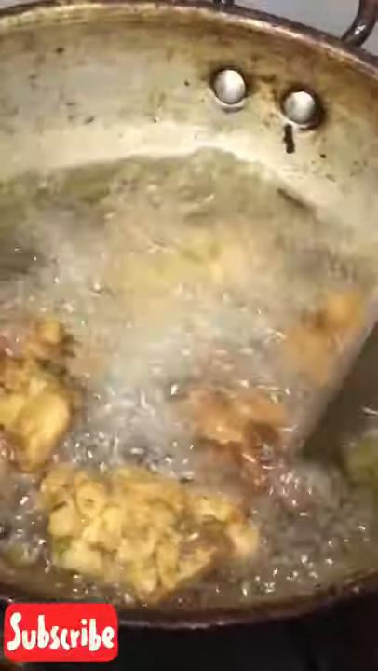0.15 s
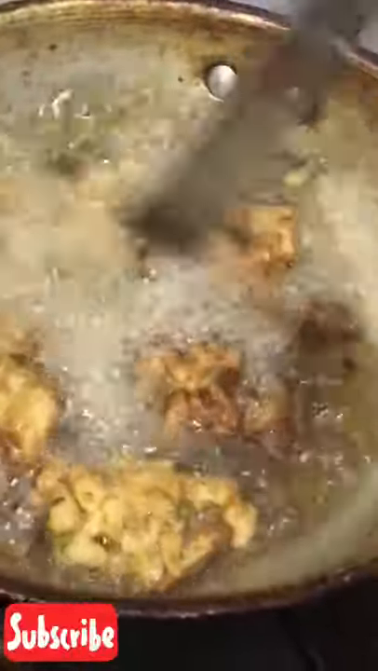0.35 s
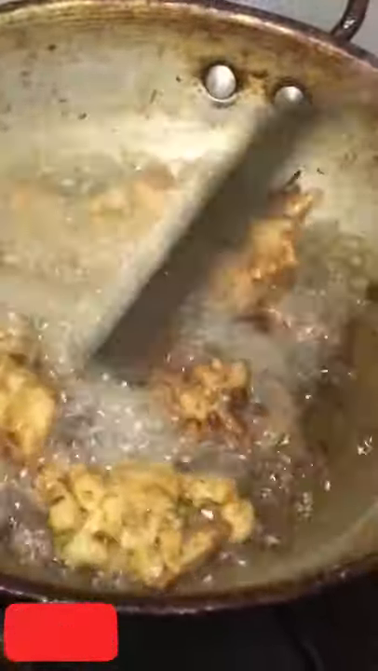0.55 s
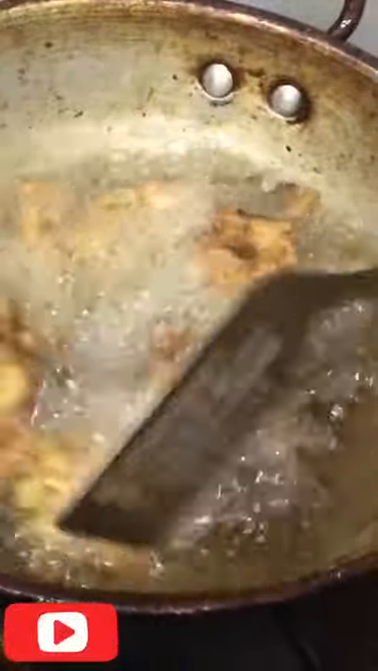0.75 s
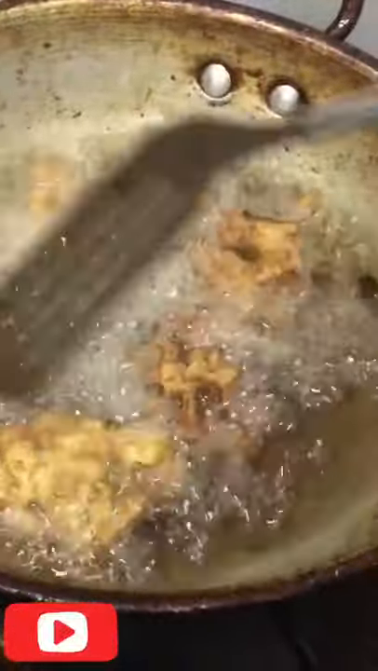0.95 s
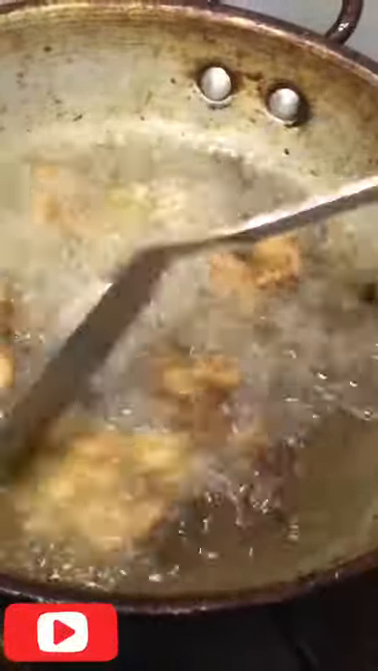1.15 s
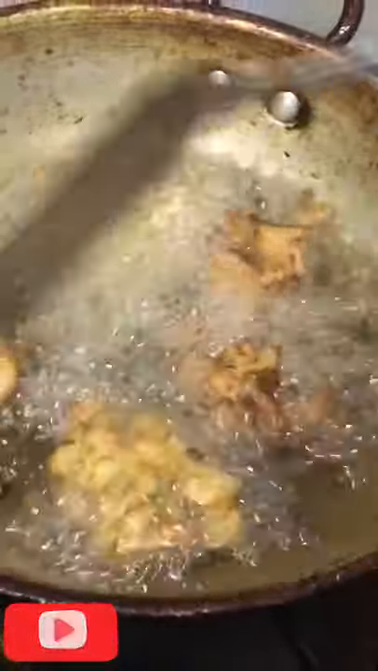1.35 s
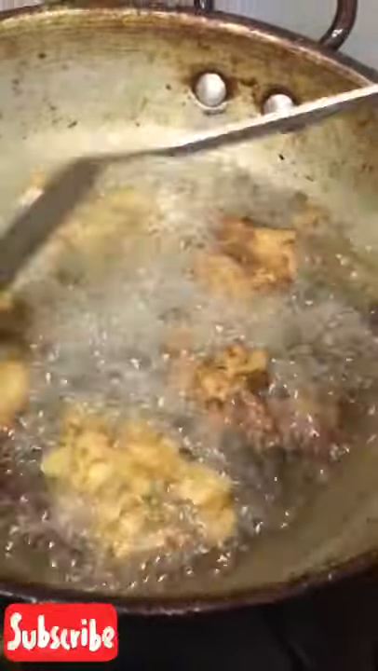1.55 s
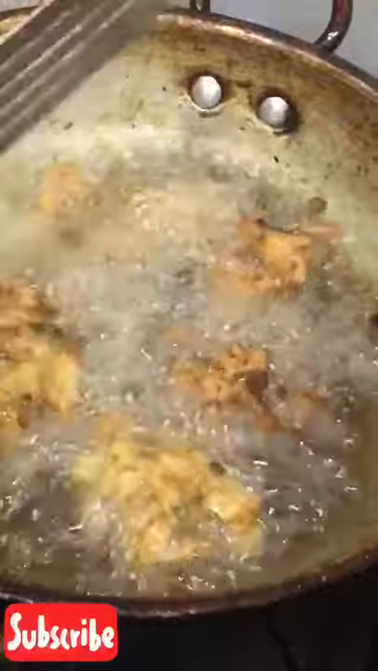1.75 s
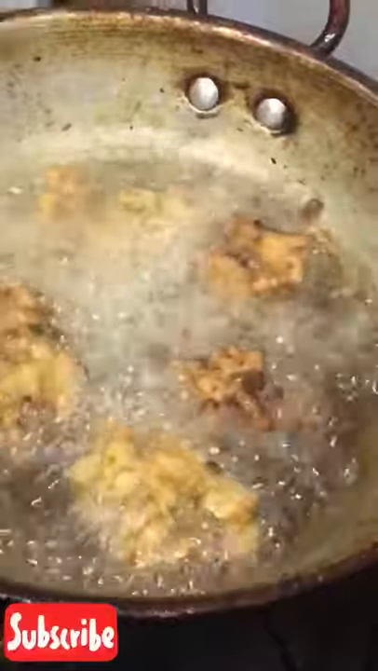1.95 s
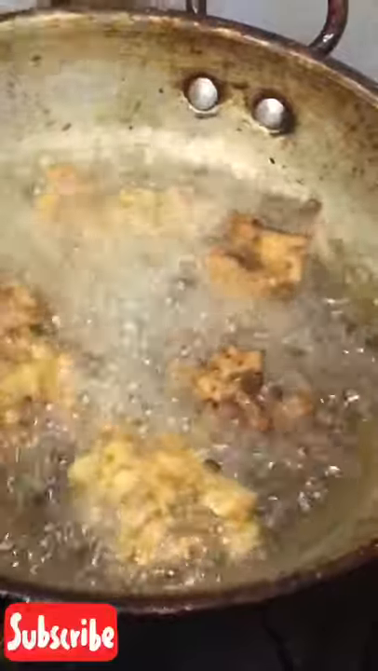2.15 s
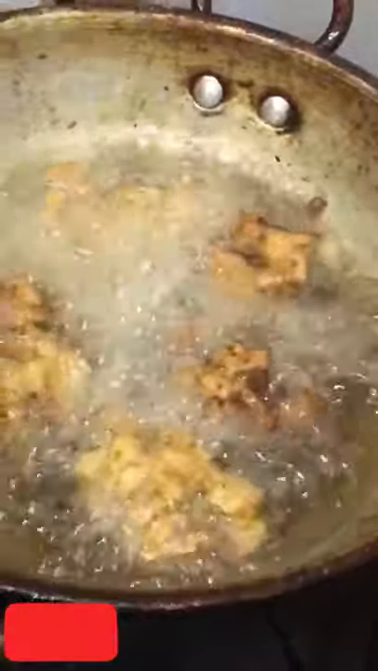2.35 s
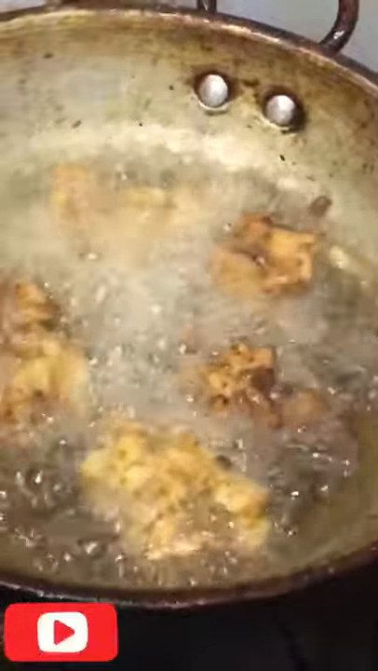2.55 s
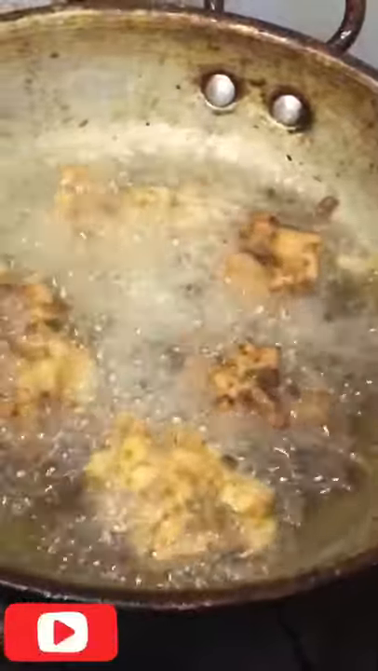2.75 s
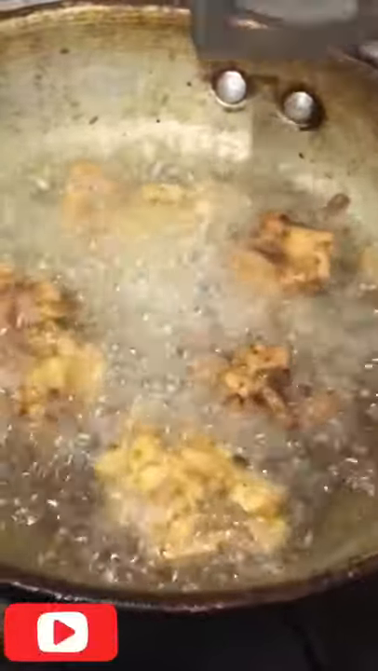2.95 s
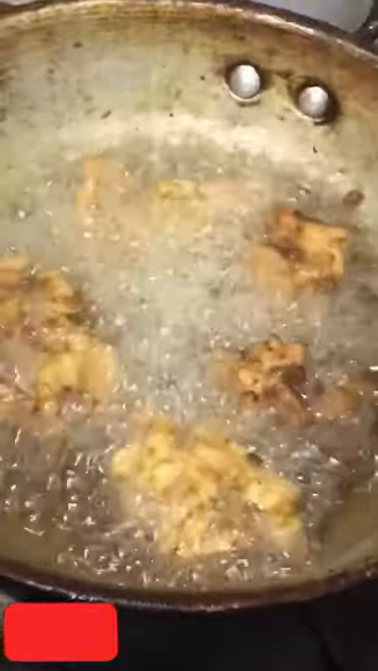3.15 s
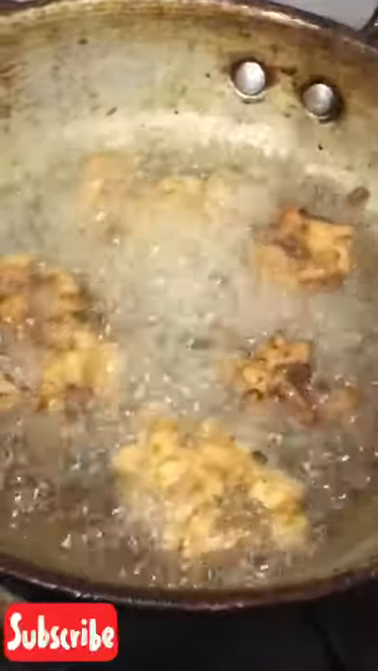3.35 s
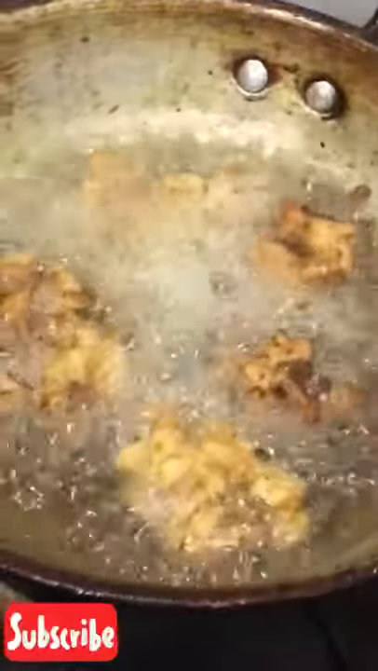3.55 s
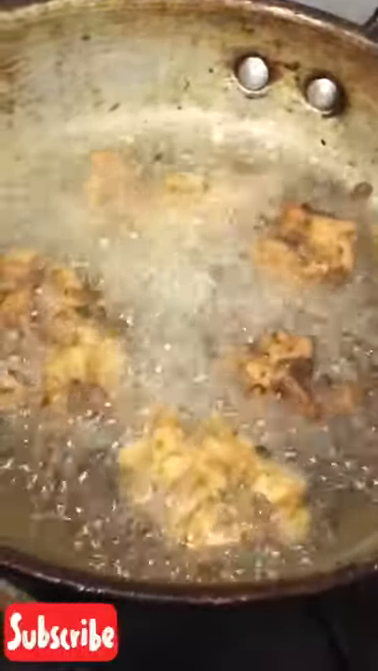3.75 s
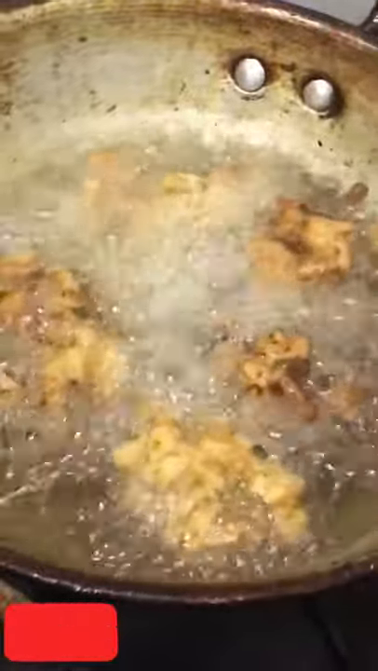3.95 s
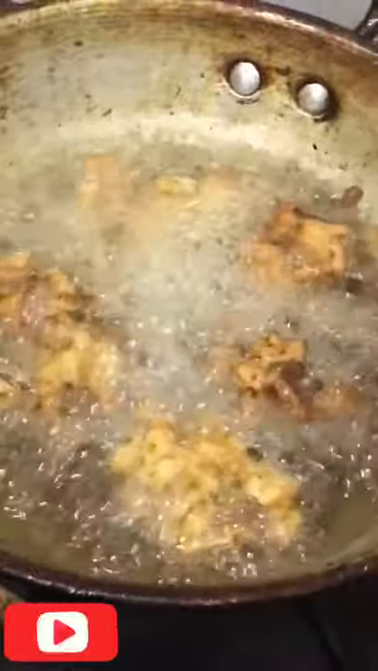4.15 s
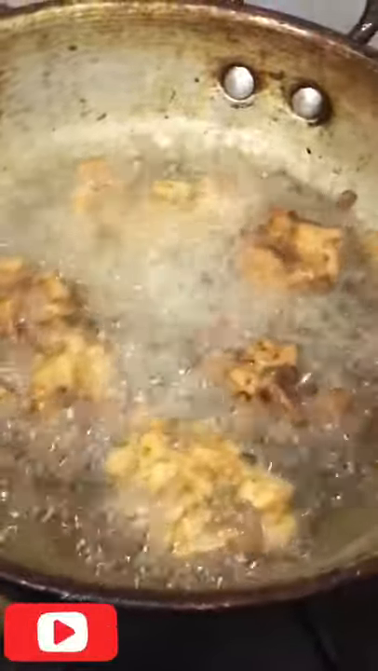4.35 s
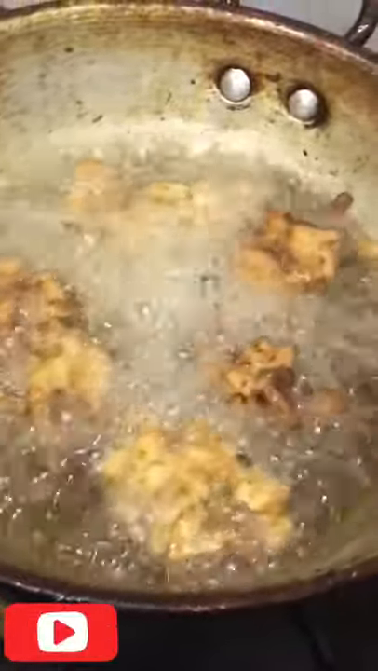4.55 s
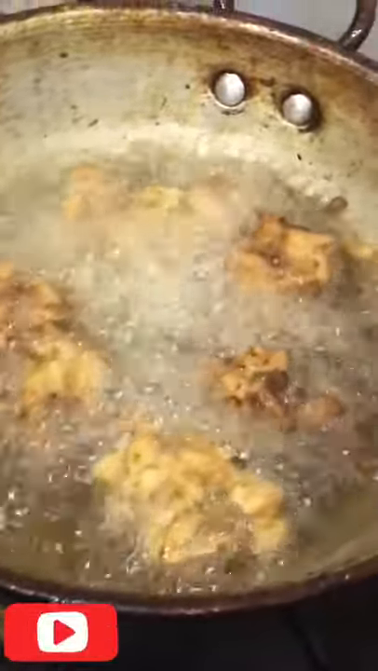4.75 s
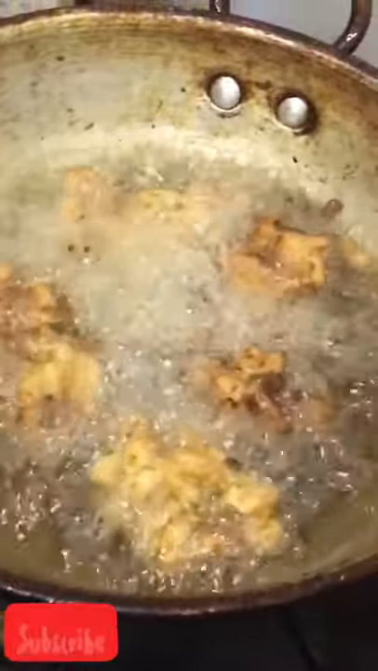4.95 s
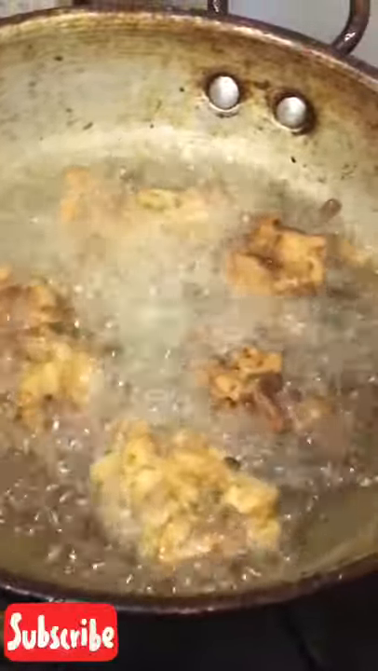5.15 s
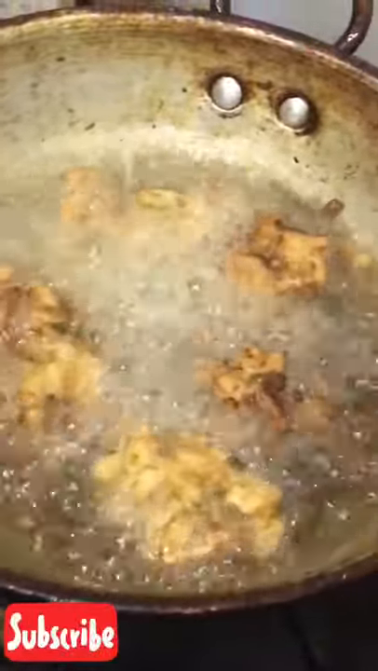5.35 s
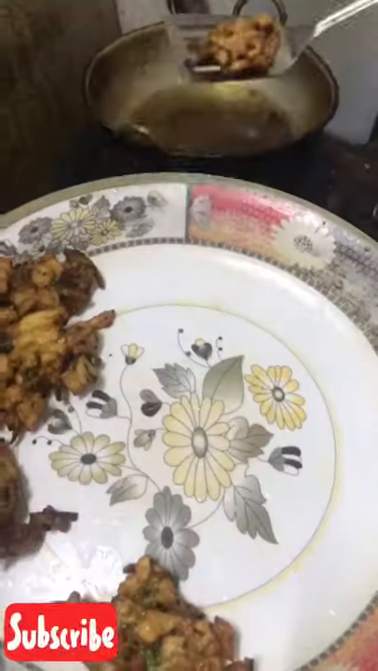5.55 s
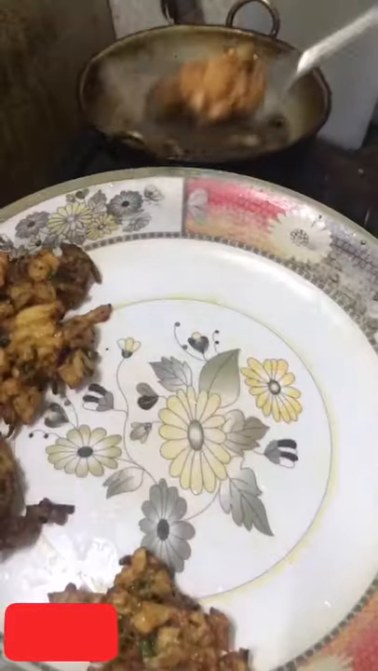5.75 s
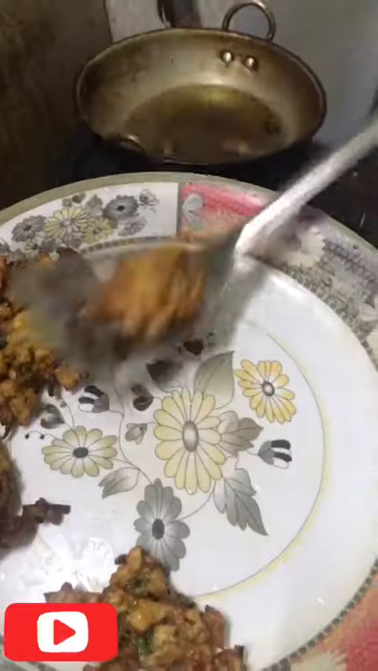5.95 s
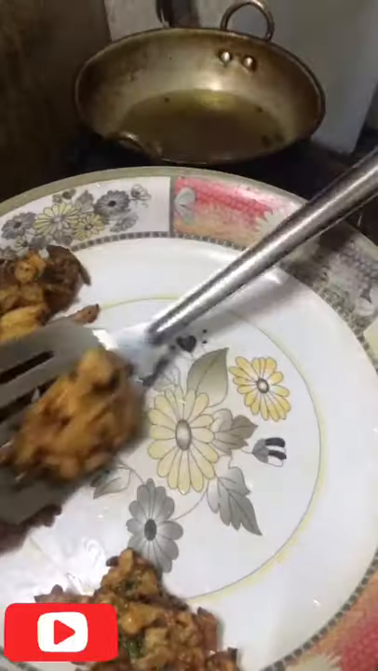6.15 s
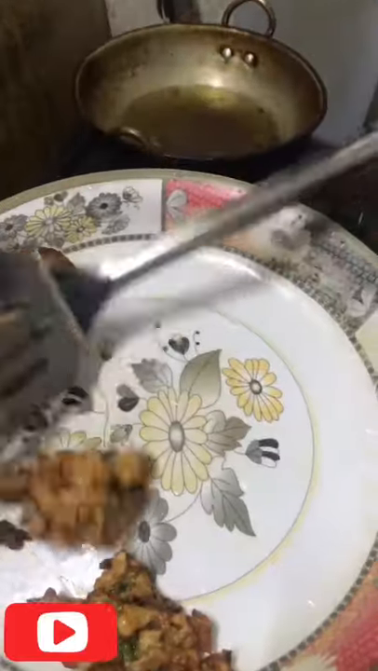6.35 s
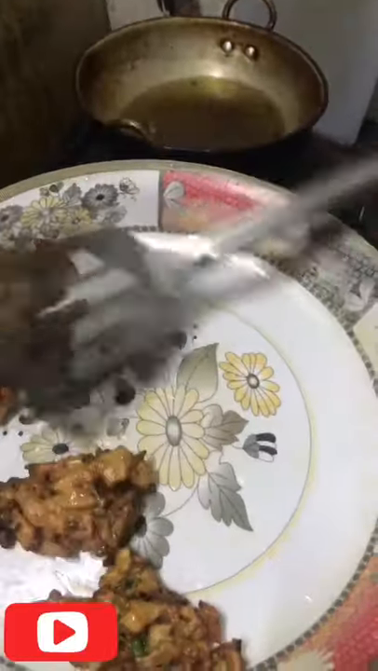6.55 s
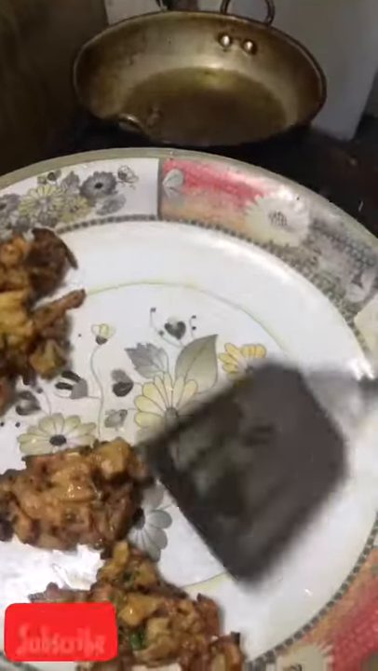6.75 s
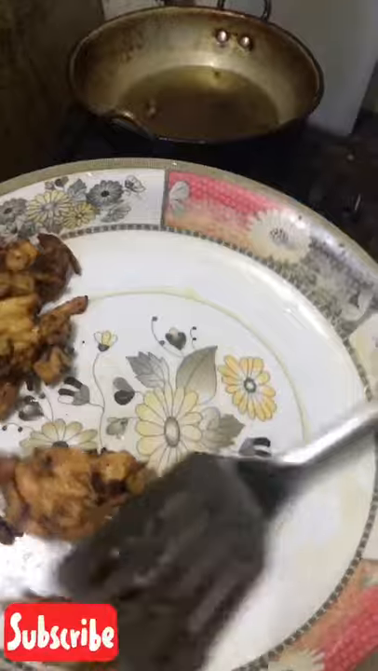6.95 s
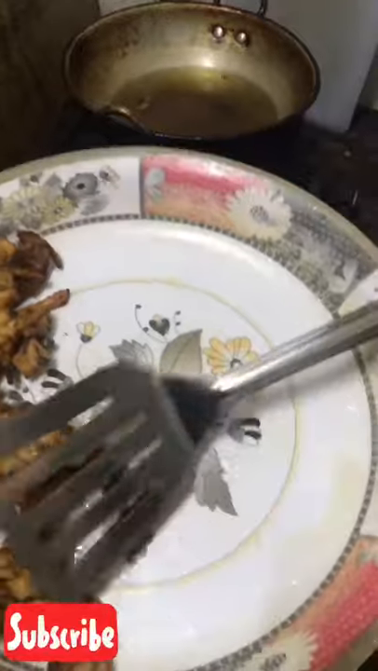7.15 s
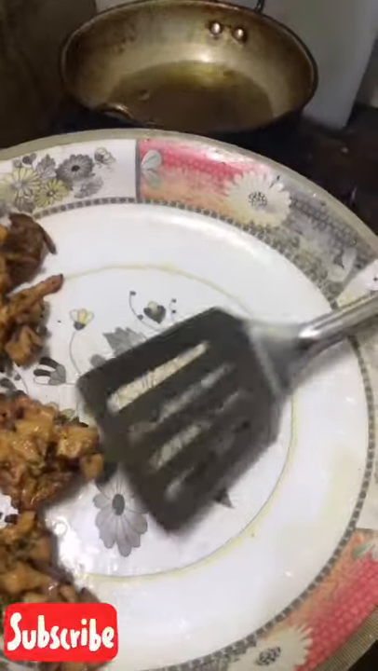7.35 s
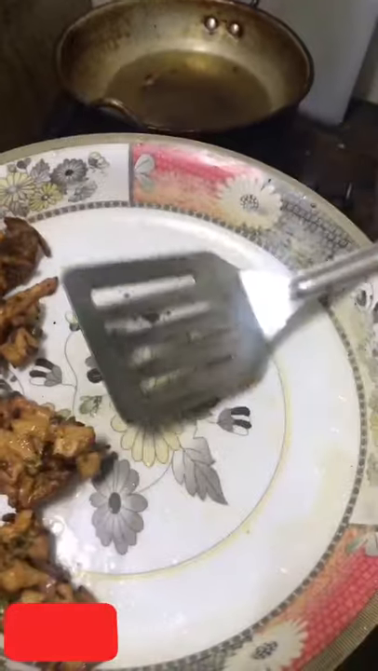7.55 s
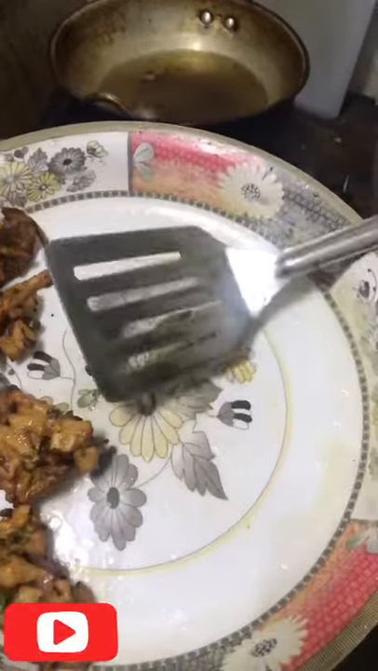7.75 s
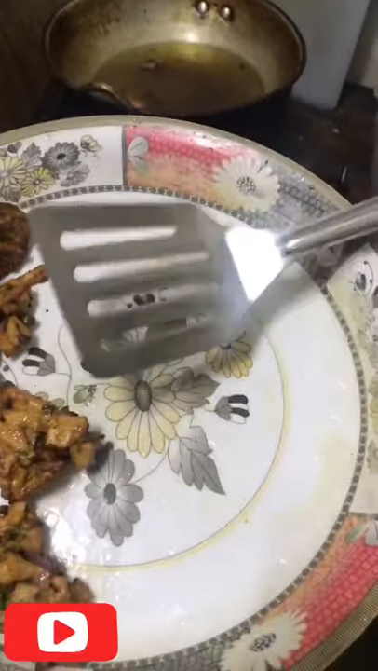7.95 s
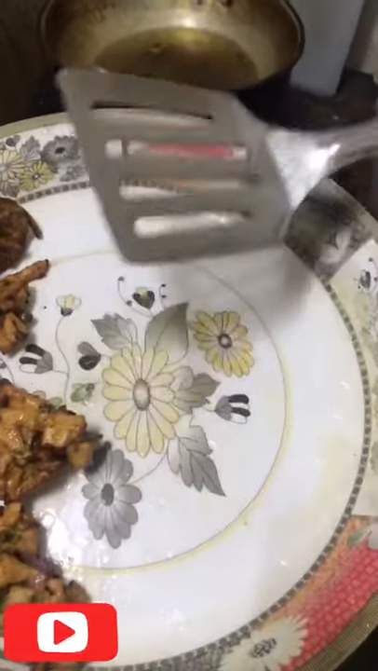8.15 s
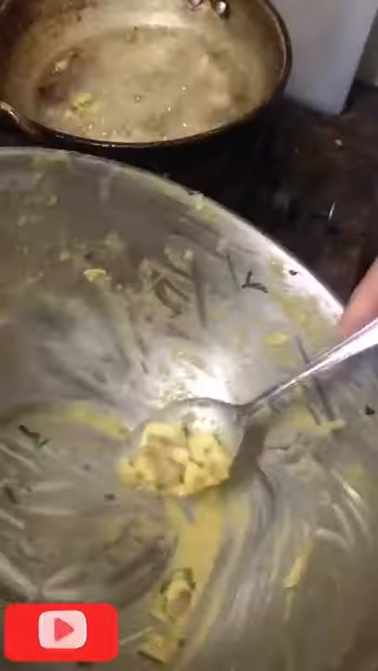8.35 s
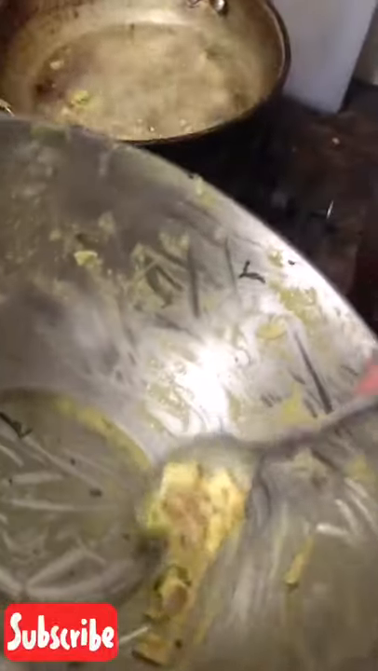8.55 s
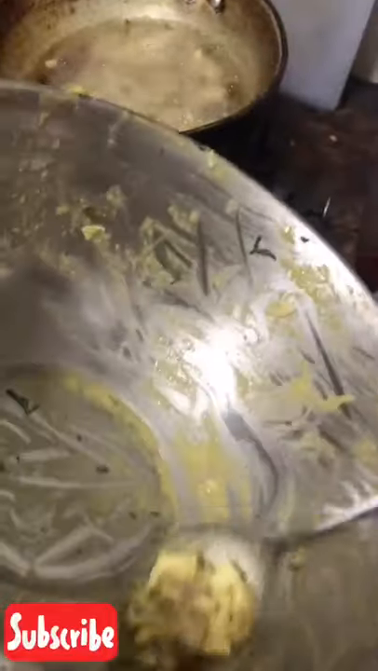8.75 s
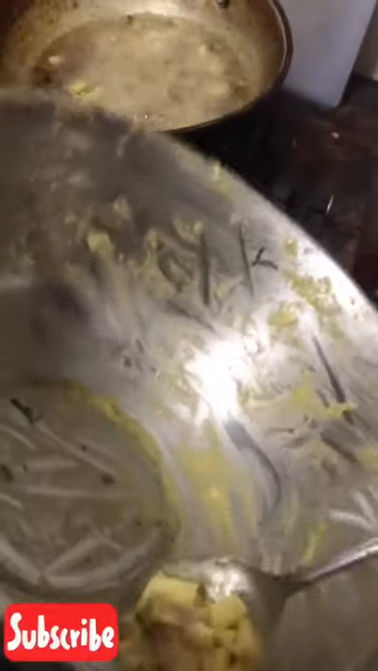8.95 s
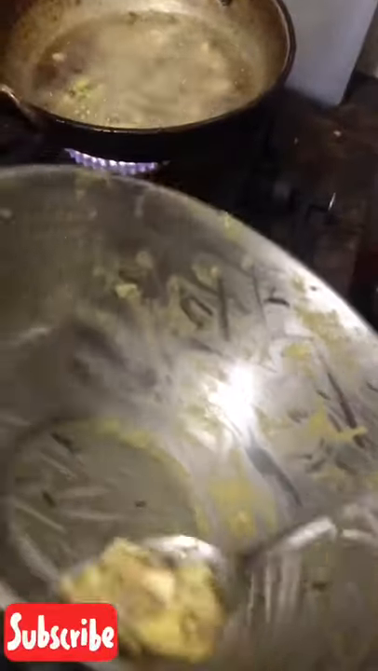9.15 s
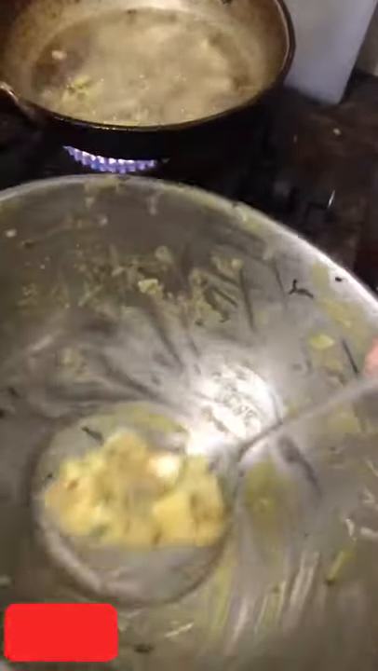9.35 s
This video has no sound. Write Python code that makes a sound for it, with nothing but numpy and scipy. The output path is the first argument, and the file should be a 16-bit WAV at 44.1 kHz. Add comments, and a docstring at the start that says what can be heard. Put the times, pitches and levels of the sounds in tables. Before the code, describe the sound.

Close crackling of deep frying gives way to spatula knocks on a plate and a spoon tapping and scraping a bowl over softer hissing.

```python
"""Frying fritters in a small kitchen

Three scenes follow one another in mono. Close to the pan, steam bursts make hot oil sizzle and spit
over the rumble of a gas burner and a low hum. Next the oil hisses further off and steam whistles from
a crust, while a slotted steel spatula knocks a fritter onto a plate, exciting the modes of plate and
blade. Last, a spoon strikes a steel bowl and scrapes batter from its wall by stick-slip friction."""
import sys
import numpy as np
from scipy import signal
from scipy.fft import rfft, irfft
from scipy.io import wavfile

SR = 44100
rng = np.random.default_rng(int(sys.argv[2]) if len(sys.argv) > 2 else 0)


def unload_wav(signal):
    """Save mono or channel-first audio to the path in sys.argv[1] as 16-bit WAV at rate SR, clipped to [-1, 1]."""
    wavfile.write(
        sys.argv[1],
        SR,
        np.round(np.clip(np.atleast_2d(signal).T, -1, 1) * 32767).astype(np.int16),
    )


N = 418509
PLATE_START_S, BOWL_START_S = 5.48, 8.245

# modes of the steel bowl: frequency_hz, level_db, t60_s
BOWL_MODES = [(603.6, -2.5, 0.18), (621, -25.5, 1), (590, -34, 0.2), (255, -20, 0.059), (683, -18, 0.14),
              (730, -28, 0.4), (840, -30.5, 0.78), (1150, -34, 0.44), (1850, -24, 0.16), (2460, -13, 0.12),
              (2570, -13, 0.056), (2660, -26, .12), (3320, 2.5, 0.024), (3290, 4.5, 0.0084),
              (3560, -37, .2), (3460, -9, 0.043), (4820, -33, .05), (5790, -10, 0.039), (6500, -23, 0.055),
              (7200, -20, 0.075), (8860, -25, 0.049)]
# spectrum of sliding steel: frequency_hz, gain_db
RASP_SPECTRUM = [(400, -3), (2400, -8), (3220, -6), (3390, 8), (3560, -18), (4000, -1), (5200, -10),
                 (6650, 4.5), (7700, -4), (8400, 1), (10000, 1.5), (11200, 1), (12500, -6), (16000, -11.5)]


def undb(db):
    """Amplitude ratio of a level in decibels."""
    return 10 ** (np.asarray(db) / 20)


def unit(x):
    """Normalisation to an rms of 1."""
    return x / np.sqrt(np.mean(x ** 2) + 1e-20)


def clock(seconds):
    """Sample times over a duration."""
    return np.arange(int(seconds * SR)) / SR


def fade(t, t60):
    """Exponential decay, 60 dB down at t60."""
    return np.exp(-np.log(1000) * t / max(t60, 1e-4))


def add(out, start_s, x):
    """Superposition of x on out from start_s."""
    i = max(int(start_s * SR), 0)
    out[i:i + len(x)] += x[:len(out) - i]


def colour(x, spectrum, size=4096):
    """Minimum-phase filter of unit power gain, shaped by rows of frequency_hz, gain_db."""
    hz, db = np.transpose(spectrum)
    bin_hz = np.arange(size // 2 + 1) * SR / size
    log_gain = np.log(undb(np.interp(np.log(bin_hz + 1), np.log(hz), db)))
    cepstrum = irfft(log_gain)[:size // 2]
    cepstrum[1:] *= 2
    response = irfft(np.exp(rfft(cepstrum, size)))
    return signal.oaconvolve(x, response / np.linalg.norm(response))[:len(x)]


def drift(rate_hz):
    """Random modulation: interpolated Gaussian values with a spread near 1."""
    knots = rng.standard_normal(size=4096)
    return 1.2 * np.interp(np.arange(N) / SR * rate_hz, np.arange(len(knots)), knots)


def grains(per_s, spread_db):
    """Shot noise: random clicks, mostly tiny and a few large."""
    size = undb(spread_db * np.minimum(rng.exponential(size=N), 7))
    occurs = rng.random(N) < per_s / SR
    return unit(occurs * size * rng.choice([-1, 1], N))


def burst(t60):
    """Transient excitation: a decaying shower of pressure spikes."""
    t = clock(.12)
    return rng.choice([-1., 1.], len(t)) * fade(t, t60)


def ring(modes):
    """Free vibration: damped modes that start from rest, with alternating sign."""
    t = clock(.7)
    return sum((-1) ** k * undb(db) * fade(t, t60) * np.sin(2 * np.pi * hz * t)
               for k, (hz, db, t60) in enumerate(modes))


def sizzle(spectrum, level_db, bubbles_per_s, spread_db):
    """Countless bursting bubbles make shot noise over an even hiss of steam."""
    fizz = grains(bubbles_per_s, spread_db) + 1.1 * rng.standard_normal(N)
    flicker_db = .35 * drift(25)
    return unit(colour(fizz, spectrum)) * undb(level_db + flicker_db)


def hum(near, waver_rad=0.75):
    """Two hum tones and the faint ring of the pan waver under random phase and amplitude modulation."""
    # tones of the hum, and the faint steady ring of the pan: frequency_hz, near_db, far_db
    tones = [(92, -51.5, -87), (115.7, -45, -55), (826, -87, -67.5)]
    t = np.arange(N) / SR
    out = np.zeros(N)
    for hz, near_db, far_db in tones:
        tone = np.sqrt(2) * np.sin(2 * np.pi * hz * t + waver_rad * drift(3.9))
        out += tone * undb((near_db if near else far_db) + 2 * drift(6.1))
    return out


def burner(near):
    """Combustion noise: the gas flame gives a low broadband rumble."""
    # the flame close by and further off: frequency_hz, gain_db
    near_spectrum = [(15, -28), (45, -6), (64, 0.5), (80, 3.5), (102, -3), (135, -4.5), (170, -13),
                     (200, -13.5), (240, -9.5), (330, -14), (450, -16.5), (700, -34)]
    far_spectrum = [(15, -11.5), (35, -18), (56, 4.5), (67, 0.5), (77, 5), (92, -5), (114, -7.5),
                    (145, -5.5), (200, -8), (250, -5), (330, -11.5), (450, -18.5), (700, -34)]
    spectrum, level_db = (near_spectrum, -45) if near else (far_spectrum, -48.5)
    return undb(level_db) * unit(colour(rng.standard_normal(N), spectrum, size=16384))


def throb(level_db=-48.5, swell_db=3.5, swell_rate_hz=4.5):
    """The burner's draught modulates the amplitude of the flame's deepest noise at random."""
    # lowest band of the flame: frequency_hz, gain_db
    spectrum = [(15, -52), (34, -36), (44, -12), (49, -4), (56, -19), (80, -50), (200, -64)]
    rumble = unit(colour(rng.standard_normal(N), spectrum, size=16384))
    return rumble * undb(level_db + swell_db * drift(swell_rate_hz))


def pop(level_db, centre_hz, octaves, t60, snap):
    """Cavity resonance driven by a spike of height snap and a burst; level_db is its energy over 4 ms."""
    half_width = max(octaves, .1) / 2
    edges_hz = np.clip(centre_hz * 2 ** np.array([-half_width, half_width]), [50, 100], [14000, 17000])
    kick = burst(t60)
    kick[0] = snap
    cavity = signal.sosfilt(signal.butter(2, edges_hz, "band", fs=SR, output="sos"), kick)
    return undb(level_db) * cavity / np.linalg.norm(cavity) * np.sqrt(.004 * SR)


def small_pops(count=70, floor_db=-45.5, range_db=9, low_hz=4000, span_octaves=1.45):
    """Random small steam bursts, most of them faint: start_s, level_db, centre_hz, width_octaves."""
    return [(when * PLATE_START_S, floor_db + range_db * size ** 2,
             low_hz * 2 ** (span_octaves * pitch), 0.66 + 2 * width)
            for when, size, pitch, width in rng.random((count, 4))]


def spits(overtone_ratio=1.96, overtone_db=-10.5):
    """Steam pockets resonate as they burst; smaller ones sound higher and empty faster."""
    # the loudest steam bursts: start_s, level_db, centre_hz, width_octaves
    loud_pops = [(.053, -31, 9000, 3.2), (.14, -33, 2500, 3.7), (.2235, -34, 7500, 2.7),
                 (.288, -35, 8000, 4.6), (0.5885, -16.5, 2980, 0.51), (.655, -29, 6000, .62),
                 (.846, -33.5, 6950, 0.73), (0.8772, -19.5, 1280, .5), (0.9225, -27, 7000, 3.6),
                 (.9693, -29.5, 3800, 0.53), (.983, -32.5, 5000, 2.2), (1.044, -33.5, 1540, 1.4),
                 (1.0771, -34, 6960, 1), (1.149, -16.5, 3090, 0.42), (1.235, -37.5, 6740, 0.17),
                 (1.302, -29, 11000, 1.1), (1.4007, -35, 4500, 4.7), (1.4537, -34, 6000, 4.4),
                 (1.5036, -34, 4940, 1.2), (1.5954, -30, 10200, 1.1), (1.758, -36, 11000, 1.4),
                 (2.0533, -23.5, 13000, .69), (2.1456, -37.5, 4770, .9), (2.649, -30, 7360, .44),
                 (2.7128, -34, 7100, 0.21), (2.877, -29, 2430, 2.2), (2.9355, -21.5, 3060, 1.6),
                 (3.4571, -33, 6300, .31), (3.5487, -31.5, 4670, 1.9), (3.8627, -29.5, 7800, 1),
                 (3.995, -27, 7500, 2.7), (4.262, -23.5, 3120, 0.39), (4.5687, -29.5, 4300, 0.23),
                 (4.9995, -33.5, 3300, 0.77), (5.1931, -30, 1310, 1.9), (5.3633, -36.5, 11000, 5.5),
                 (5.424, -33, 11000, 3.1)]
    out = np.zeros(N)
    for start_s, db, hz, octaves in loud_pops + small_pops():
        t60 = 0.014 * (3000 / hz) ** 0.3
        add(out, start_s, pop(db, hz, octaves, t60, snap=8.2))
        if hz < 4000:  # large pockets also ring in a second mode
            add(out, start_s, pop(db + overtone_db, hz * overtone_ratio, octaves, t60, snap=4))
    return out


def bumps():
    """Dull knocks at the stove: broad resonances that decay more slowly than the spits."""
    # knocks: start_s, level_db, centre_hz
    knocks = [(.141, -30, 547), (2.936, -27.5, 1200)]
    out = np.zeros(N)
    for start_s, db, hz in knocks:
        add(out, start_s, pop(db, hz, octaves=2.45, t60=0.1, snap=5.6))
    return out


def whistle(start_hz=9500, rise_hz_per_s=250, start_db=-58, fade_db_per_s=4, waver_rad=5.2):
    """Flow tone: steam forced through a pore in the crust sounds unsteadily, rising as it fades."""
    age_s = np.maximum(np.arange(N) / SR - PLATE_START_S, 0)
    pitch_hz = start_hz + rise_hz_per_s * age_s
    level_db = start_db - fade_db_per_s * age_s + 2 * drift(40)
    phase = 2 * np.pi * np.cumsum(pitch_hz) / SR + waver_rad * drift(180)
    return np.sqrt(2) * undb(level_db) * np.sin(phase)


def clack(spectrum, t60, snap, tail_db, tail_t60):
    """Contact transient: one hard spike, the chatter of many short modes and a faint grainy tail."""
    kick = burst(t60) + undb(tail_db) * burst(tail_t60)
    kick[0] = snap
    return colour(kick, spectrum)


def spatula(clack_db=-1.56, stand_db=-16):
    """Impacts excite plate and blade; a blow cushioned by the fritter favours the plate's low modes."""
    # blows, harder with greater tilt: start_s, strength_db, tilt_db_per_octave, blade_relative_db
    blows = [(5.8915, -12.5, 3.2, -6), (6.175, -20, -2.5, -12), (6.2608, -37.5, -6.5, -12),
             (6.3052, -34.5, -5.5, -20), (6.3317, -26, -5, -4.5), (6.3658, -35, -6.5, -6),
             (6.387, -37, -1.5, -10), (6.4362, -27.5, -4.5, -9), (6.771, -18.5, -1, 1.5),
             (6.7761, -23.5, -2.5, -14), (6.824, -28.5, -2.5, 0), (6.8561, -19, -3.2, -12),
             (6.9148, -26.5, -1, -2.5), (6.931, -28, -4, -20), (7.028, -31.5, 6, -23),
             (7.3803, -19.5, -1.5, 0), (7.444, -32.5, -3.5, -2.5)]
    # modes of the plate's middle, its rim, its stand and the blade: frequency_hz, level_db, t60_s
    plate_modes = [(349, -0.5, 0.16), (365, -24, 0.72), (328, -14, 0.063), (209, -21, 0.076),
                   (174, -20, 0.044), (390, -38, 0.058)]
    rim_modes = [(566, 2.5, 0.034), (644, -7, 0.15), (726, -4, 0.03), (722, -26, 0.13), (800, -10, 0.11),
                 (1140, -12, 0.099)]
    stand_modes = [(760, 2.5, 0.029), (780, -24, 0.048), (880, -12.5, 0.068), (1080, 4, 0.032),
                   (1087, -1.5, 0.063), (1155, 2.5, 0.027), (1400, -16, 0.043), (2180, -10, .05)]
    blade_modes = [(1383, -0.5, 0.036), (1580, -33, 0.062), (1790, -23, 0.077), (2058, 8.5, 0.025),
                   (2130, 0, 0.03), (2424, -1.5, 0.044), (3020, -8, 0.022), (3180, -18, 0.049),
                   (4020, -26, 0.044), (4050, -8, 0.038), (4600, -40, 0.04), (5320, -13, 0.055),
                   (5900, -15, 0.038), (6700, -11, 0.045), (7400, -40, 0.067)]
    # contact of steel and plate: frequency_hz, gain_db
    contact_spectrum = [(100, -11), (250, -25.5), (520, -4.5), (800, 0), (1150, -7.5), (1700, -2),
                        (2200, -3.5), (2800, -3.5), (4200, -0.5), (5200, -9.5), (9000, -8.5),
                        (11000, -12.5), (16000, -17)]
    out = np.zeros(N)
    plate, rim, blade = ring(plate_modes), ring(rim_modes), ring(blade_modes)
    for start_s, strength_db, tilt, blade_db in blows:
        tilted = [(hz, db + tilt * np.log2(hz)) for hz, db in contact_spectrum]
        contact = clack(tilted, t60=0.041, snap=14, tail_db=-16, tail_t60=0.12)
        add(out, start_s, undb(strength_db + clack_db) * contact)
        body = undb(0.4 - 0.5 * tilt) * plate + undb(-11.5 - 1.6 * tilt) * rim
        add(out, start_s, undb(strength_db) * (body + undb(blade_db) * blade))
    add(out, blows[0][0], undb(stand_db) * ring(stand_modes))  # the heaviest blow jolts the stand
    return out


def friction(starts_s, lengths_s, levels_db, slips_per_s, uneven_db=2):
    """Stick-slip friction: random clicks under a force that swells and sinks with each stroke."""
    force = np.zeros(N)
    for start_s, length_s, db in zip(starts_s, lengths_s, levels_db):
        arch = np.sqrt(np.abs(np.sin(np.pi * clock(length_s) / length_s)))
        add(force, start_s, undb(db) * arch)
    return force * grains(slips_per_s, spread_db=2.2) * undb(uneven_db * drift(90))


def drags():
    """Sliding friction: the spatula rasps on the plate, crushes crust and chatters as it lifts clear."""
    # spatula strokes: start_s, length_s, rasp_db, crunch_db, buzz_db
    strokes = [(6.176, 0.061, -67, -35, -60), (6.28, 0.25, -64, -47.5, -66), (6.82, 0.15, -58, -32, -58),
               (6.97, 0.11, -46, -40, -53), (7.066, 0.041, -41, -40, -62), (7.39, 0.17, -65, -48, -47.5),
               (7.548, .026, -68, -46.5, -46), (7.575, 0.047, -51, -56.5, -53)]
    # crushed crust and chattering blade: frequency_hz, gain_db
    crunch_spectrum = [(100, -21), (260, -5), (355, 17.5), (450, 3), (740, 5.5), (1050, -3), (1400, -1.5),
                       (2000, -9), (3200, -2), (4500, -10), (7000, -17), (16000, -40)]
    buzz_spectrum = [(1000, -64), (1850, -13), (2010, -2), (2080, -2), (2200, -20), (2340, -13),
                     (2700, -33), (5000, -47)]
    start_s, length_s, rasp_db, crunch_db, buzz_db = np.transpose(strokes)
    rasp = friction(start_s, length_s, rasp_db, slips_per_s=3000)
    crunch = friction(start_s, length_s, crunch_db, slips_per_s=700)
    buzz = friction(start_s, length_s, buzz_db, slips_per_s=1600, uneven_db=-0.5)
    return colour(rasp, RASP_SPECTRUM) + colour(crunch, crunch_spectrum) + colour(buzz, buzz_spectrum)


def spoon(start_s=8.4573, ring_db=-11.5, clack_db=-16):
    """One impact excites the bowl's modes; the hand that holds it damps most of them at once."""
    # contact of spoon and bowl: frequency_hz, gain_db
    contact_spectrum = [(100, -18), (380, 7), (750, 3.5), (1400, -12), (2300, -1), (3300, 7), (4400, -6),
                        (6500, -12), (10000, -18), (16000, -34)]
    contact = clack(contact_spectrum, t60=0.02, snap=12, tail_db=-10, tail_t60=0.13)
    out = np.zeros(N)
    add(out, start_s, undb(ring_db) * ring(BOWL_MODES))
    add(out, start_s, undb(clack_db) * contact)
    return out


def scrapes():
    """Forced vibration: the spoon's friction drives the bowl's low modes, rasps and smears batter."""
    # spoon strokes: start_s, length_s, rasp_db, rub_db, smear_db
    strokes = [(8.698, 0.11, -41, -48, -55), (8.8, 0.087, -71, -48, -56), (8.9, 0.45, -64, -63, -57.5),
               (9.1, 0.041, -48.5, -68, -74)]
    # wet batter: frequency_hz, gain_db
    smear_spectrum = [(100, -20), (300, 4), (600, 1), (1000, 2), (1500, -6), (2800, -13), (4500, -10),
                      (16000, -26)]
    start_s, length_s, rasp_db, rub_db, smear_db = np.transpose(strokes)
    rub = friction(start_s, length_s, rub_db, slips_per_s=1200)
    smear = friction(start_s, length_s, smear_db, slips_per_s=2300)
    rasp = friction(start_s, length_s, rasp_db, slips_per_s=11000)
    low_ring = ring([(hz, 0, t60 / 2) for hz, _, t60 in BOWL_MODES if 500 < hz < 1000])
    bowl = signal.fftconvolve(rub, low_ring / np.linalg.norm(low_ring))[:N]
    return bowl + colour(smear, smear_spectrum) + colour(rasp, RASP_SPECTRUM)


def kitchen(x, early_db, room_db, early_t60, room_t60):
    """Reverberation: early reflections from pan and worktop, then the dull tail of a small hard room."""
    t = clock(.6)
    echo = np.zeros(len(t))
    for db, t60, delay_s in [(early_db, early_t60, .002), (room_db, room_t60, .008)]:
        reflections = rng.standard_normal(len(t)) * fade(t, t60) * (t > delay_s)
        echo += undb(db) * reflections / np.linalg.norm(reflections)
    echo = signal.sosfilt(signal.butter(1, [350, 8000], "band", fs=SR, output="sos"), echo)
    return x + signal.oaconvolve(x, echo)[:N]


def gate(start_s, end_s, rise_s=0.03):
    """Time window that rises quickly and stops dead."""
    t = np.arange(N) / SR
    return np.clip((t - start_s) / rise_s, 0, 1) * (t < end_s)


def scene():
    """Superposition of the sources at three listening places in turn: pan, plate and bowl."""
    # the oil as heard at each place: frequency_hz, gain_db
    oil_at_pan = [(280, -38.5), (470, -14), (585, 2), (869, -1.5), (1370, 1), (1970, -3.5), (2600, -3),
                  (2840, -5), (3150, -3), (3810, -5.5), (6730, -3.5), (7680, -6.5), (10400, -4),
                  (12400, -3.5), (15500, -7)]
    oil_at_plate = [(280, -54), (470, -8), (594, -11), (639, 0), (762, -16), (796, -3), (921, -8.5),
                    (1540, -10), (2180, -12.5), (3060, -10), (4880, -9.5), (6440, -8), (10400, -9),
                    (13000, -5), (15500, -10)]
    oil_at_bowl = [(280, -30), (470, -2), (882, -4.5), (1080, -8), (1180, -4), (1390, -8), (2880, -10),
                   (3340, -10), (5100, -9.5), (15500, -14.5)]
    # treble of the oil's hiss at the plate: time_s, level_db
    hiss_treble = [(5.55, -53.5), (6.29, -50), (7.46, -52.5), (8.08, -52.5), (8.2, -52.5)]
    far_stove = hum(near=False) + burner(near=False)
    at_pan = sizzle(oil_at_pan, level_db=-41.5, bubbles_per_s=7000, spread_db=3.5)
    at_pan += hum(near=True) + burner(near=True) + throb()
    at_pan += kitchen(spits() + bumps(), early_db=-6, room_db=-9.5, early_t60=0.012, room_t60=0.32)
    # the whole hiss lies 5 dB above its treble
    hiss_db = 5 + np.interp(np.arange(N) / SR, *np.transpose(hiss_treble))
    at_plate = sizzle(oil_at_plate, hiss_db, bubbles_per_s=10000, spread_db=3) + far_stove + whistle()
    at_bowl = sizzle(oil_at_bowl, level_db=-49, bubbles_per_s=7700, spread_db=3) + far_stove
    utensils = spatula() + drags() + spoon() + scrapes()
    utensils = kitchen(utensils, early_db=-15, room_db=-12, early_t60=0.045, room_t60=0.37)
    # a 110 Hz high-pass keeps the knocks and scrapes free of deep bass
    utensils = signal.sosfilt(signal.butter(2, 110, "high", fs=SR, output="sos"), utensils)
    mono = (at_pan * gate(-np.inf, PLATE_START_S) + at_plate * gate(PLATE_START_S, BOWL_START_S)
            + at_bowl * gate(BOWL_START_S, np.inf) + utensils)
    return np.array([mono, mono])


def record(dry, notch_hz=10400, notch_q=9, notch_depth=0.35, ceiling=.75, top_hz=15850):
    """Microphone response: a narrow dip in the treble, then peak clipping and a steep low-pass."""
    notch_band = signal.lfilter(*signal.iirpeak(notch_hz, notch_q, fs=SR), dry)
    clipped = np.clip(dry - notch_depth * notch_band, -ceiling, ceiling)
    return signal.sosfilt(signal.ellip(10, .2, 70, top_hz, fs=SR, output="sos"), clipped)


dry = scene()
out = record(dry)
unload_wav(out)
```